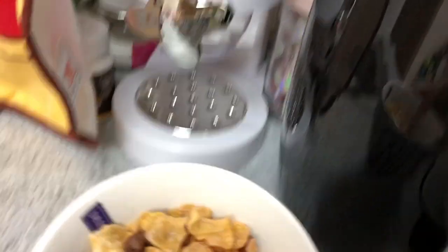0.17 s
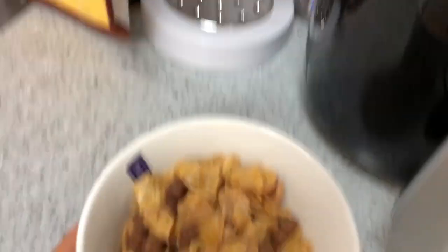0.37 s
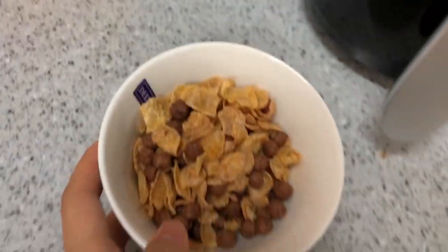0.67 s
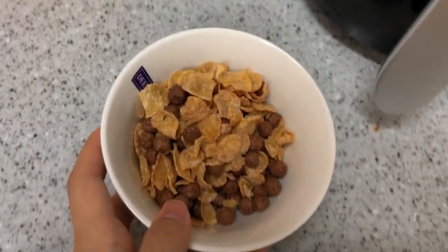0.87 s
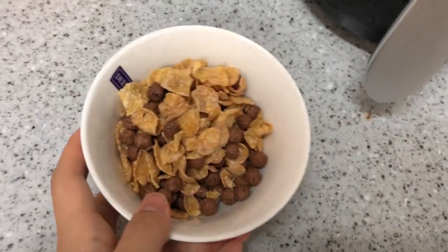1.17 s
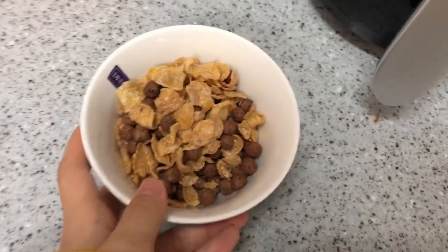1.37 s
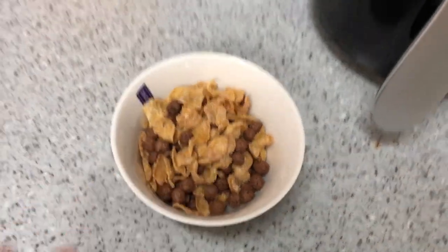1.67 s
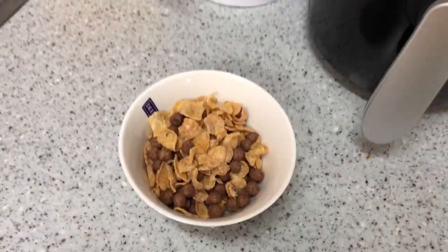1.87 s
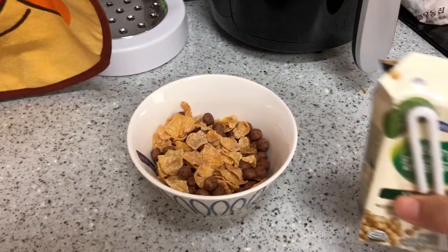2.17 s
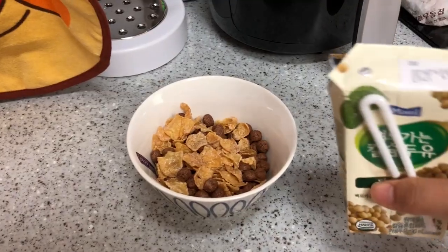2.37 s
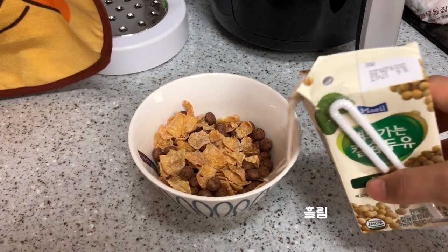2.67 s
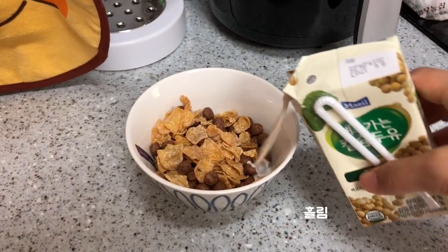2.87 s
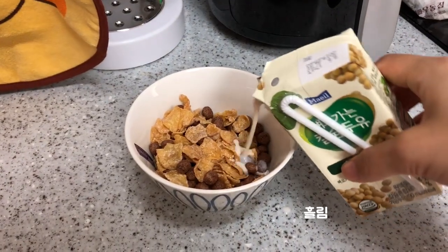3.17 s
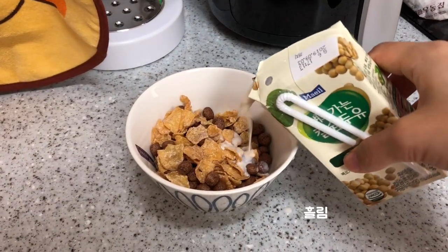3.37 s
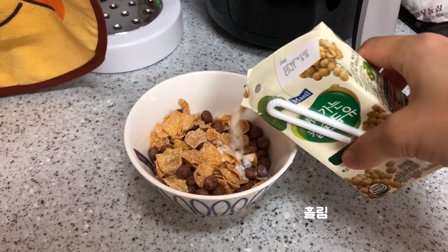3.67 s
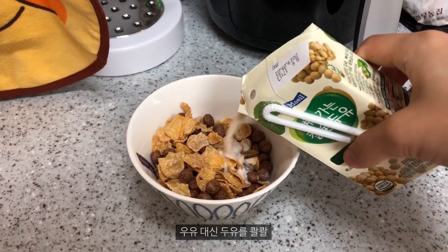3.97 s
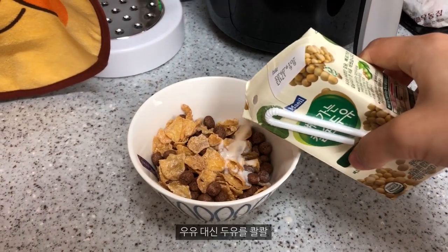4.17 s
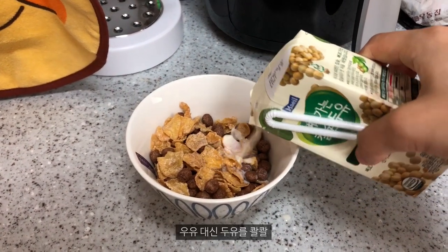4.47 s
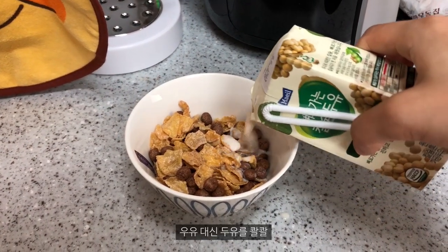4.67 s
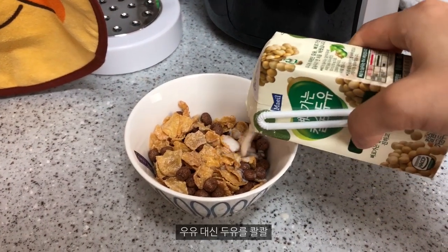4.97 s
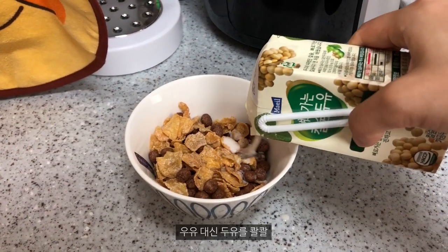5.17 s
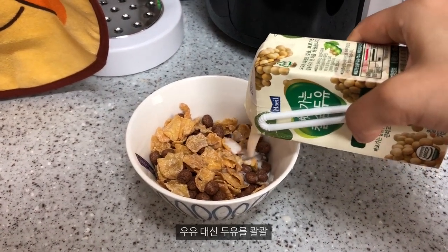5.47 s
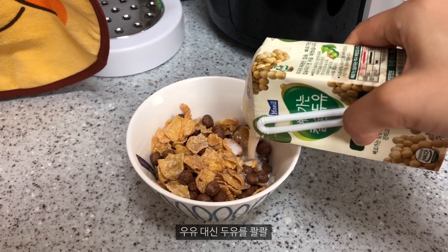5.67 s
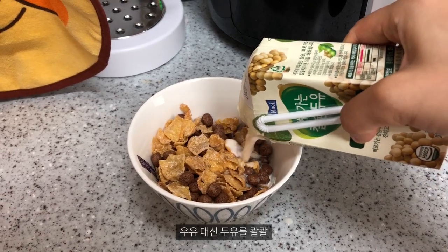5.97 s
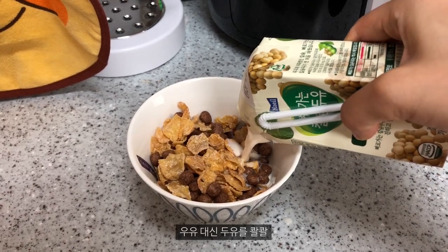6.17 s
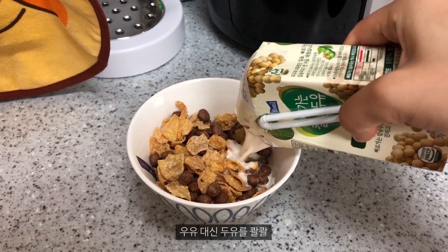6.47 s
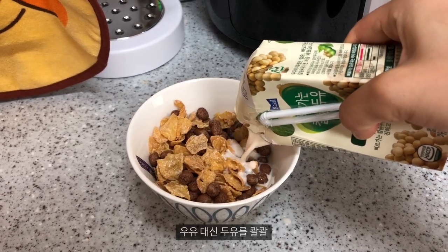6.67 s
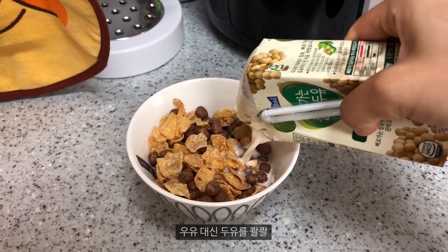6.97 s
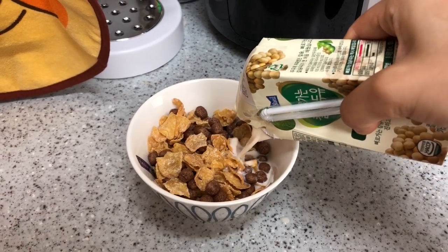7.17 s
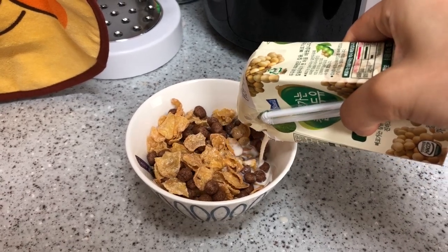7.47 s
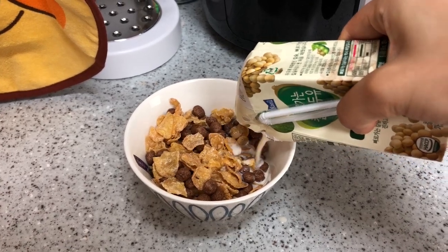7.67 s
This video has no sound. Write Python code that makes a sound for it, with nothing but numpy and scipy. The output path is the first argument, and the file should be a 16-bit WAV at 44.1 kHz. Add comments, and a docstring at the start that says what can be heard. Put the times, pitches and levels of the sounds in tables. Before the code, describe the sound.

Dry cereal flakes rustle briefly in a ceramic bowl, heard close up in a quiet kitchen. The bowl knocks onto a stone counter, scrapes a little and knocks again with a short ring. A carton crinkles, then milk trickles faintly into the cereal with a run of soft glugs. The flakes snap and crackle as it pours, most sharply near the end. A fridge hums far off.

```python
"""Cereal flakes rustle and snap in a ceramic bowl, heard from close by in a quiet kitchen.
The bowl is set on a stone counter, slid and set down again, which makes bowl and counter ring.
Then milk trickles in with tiny bubbles, the carton glugs as air enters it, and the flakes shift
and crack. A fridge hums far off."""
import sys
import numpy as np
from scipy import signal
from scipy.fft import rfft, irfft
from scipy.io import wavfile
from scipy.ndimage import uniform_filter1d

SR = 44100
rng = np.random.default_rng(int(sys.argv[2]) if len(sys.argv) > 2 else 0)


def wrap_up_sound(samples):
    """Save the sound to the file named by the first command line argument, as 16-bit audio."""
    columns = np.atleast_2d(samples).T
    # keep every value between -1 and 1, then stretch to whole-number steps
    tamed = np.clip(columns, -1, 1)
    steps = np.round(tamed * 32767).astype(np.int16)
    wavfile.write(sys.argv[1], SR, steps)


N = 345303

# The tone of the room's noise. Each row: frequency in Hz, relative level in dB.
ROOM_TONE = [(12, -56.5), (20, -28.5), (46, -8), (124, -5), (164, -13), (235, -7), (312, -10), (561, -16),
             (879, -21.5), (1160, -22.5), (1500, -25.5), (4460, -30.5), (4860, -31.5), (14500, -35.5),
             (16200, -42.5)]
# The heap is stirred and settles. Each row: time in seconds, level in dB, fading in dB per second.
STIRS = [(0.0, -50, 137), (0.2, -75.5, 20), (1.05, -78.5, 300), (1.46, -72, 24), (5.98, -74, 15),
         (6.78, -85, 30)]
# The tone of rustling flakes. Each row: frequency in Hz, relative level in dB.
RUSTLE_TONE = [(290, -55), (500, 1), (660, -9.5), (731, -0.5), (1200, 1.5), (2610, -2.5), (3930, 4),
               (14700, 1.5), (15800, -5), (16500, -24)]
# Short pings. Each row: start in seconds, level in dB, pitch in Hz, seconds to fade by 60 dB.
PINGS = [(0.004, -41, 10270, 0.062), (0.496, -63, 3770, .06), (0.518, -62.5, 3730, 0.078),
         (0.519, -64, 7200, .09), (4.072, -70, 4440, 0.04), (5.187, -47, 4380, 0.023)]
# Flakes snap. Each row: start in seconds, level in dB if all the energy came in 1 ms, pitch in Hz,
# rise up to that pitch in dB per octave, length in ms.
SNAPS = [(0.0098, -35, 10000, 10, 2.5), (0.021, -47, 15200, 8.5, 3.2), (0.049, -45, 8000, 11, 1.2),
         (0.0764, -34, 15200, 9, 0.7), (0.0944, -39, 11500, 5, 1.2), (0.1039, -36, 10700, 9, 4.1),
         (0.1098, -39.5, 12300, -4, 1.2), (0.1178, -35.5, 11500, 6.5, 1.2), (0.1278, -48, 8700, -2, 1.9),
         (0.145, -39.5, 11500, 15, 0.7), (0.1691, -48.5, 9300, 6, 1.2), (0.1842, -58, 12300, 4, 1.0),
         (0.1958, -56, 15200, -5, 0.91), (0.2245, -39, 12300, 3.5, 0.7), (0.2666, -51, 5400, 2.5, 0.89),
         (0.286, -50.5, 11500, 2, 0.73), (0.3132, -62, 15200, 1, 1.6), (0.4764, -62, 7600, 6, 1.2),
         (0.4959, -38.5, 15200, 6, 0.59), (0.5033, -49, 13200, 1, 1.1), (0.5108, -47, 15200, 0, 1.0),
         (0.5196, -41.5, 13200, 5, 0.81), (0.5772, -59.5, 15200, -2, 0.7), (0.9925, -59.5, 3500, -5, 3.7),
         (1.0833, -49.5, 15200, 7, 1.2), (1.4875, -41.5, 11900, 11, 0.79), (1.5122, -51.5, 12000, 4, 0.91),
         (1.5862, -57, 15200, -2, 1.2), (1.6663, -57.5, 7100, -5, 0.88), (1.7564, -56, 8200, 2.5, 0.78),
         (2.0636, -61.5, 13200, -1.5, 1.5), (2.499, -50.5, 7300, 11.5, 0.57), (3.1521, -50, 9300, 5, 0.65),
         (3.1778, -56.5, 7600, 12, 0.8), (3.2003, -59, 15200, 4, 1.1), (3.209, -60, 13200, -1.5, 1.3),
         (3.2289, -45, 10000, 5, 0.31), (3.3645, -60, 10000, 4, 1.6), (3.382, -52, 9300, 4, 1.0),
         (3.5269, -62, 10000, 2, 1.1), (3.7924, -55, 10700, 2, 1.4), (3.822, -63, 11500, 11, 1.6),
         (3.9037, -53, 8740, 5, 1.2), (4.0263, -63, 15200, 5, 1.0), (4.0766, -63.5, 4730, 10, 0.74),
         (4.376, -55, 15200, 6, 1), (4.5052, -56, 8700, 4, 0.95), (4.5128, -57, 4400, 4, 1.2),
         (4.5228, -51.5, 15200, 7, 1.2), (4.5701, -59, 5700, 7, 1.1), (4.5888, -53, 4150, 12, 0.84),
         (4.7605, -56.5, 12300, 1, 0.8), (4.8073, -49.5, 10000, 18, 1.2), (4.862, -41.5, 7740, 6, 1.4),
         (4.8999, -53, 15200, 4, 0.98), (5.0242, -43, 10700, 7, 0.9), (5.0382, -43.5, 7200, 15, 1.0),
         (5.0439, -56, 8700, -2, 2.5), (5.0754, -61, 6200, 4, 1.1), (5.228, -43.5, 15200, 0, 2),
         (5.3321, -62, 11500, 5, 0.8), (5.4839, -58.5, 13200, 8, 1.0), (5.5356, -62, 10700, 5, 0.9),
         (5.6706, -58, 7600, 6, 1.6), (5.6863, -52, 13200, 6.5, 1.2), (5.7472, -49.5, 13100, 0, 1.0),
         (5.824, -56.5, 5700, 12, 0.92), (5.8302, -58.5, 8700, -3, 0.91), (5.8811, -36.5, 14100, 7, 1.0),
         (5.9414, -48, 3620, 29, 0.86), (5.9511, -51, 15200, -1, 0.8), (5.9728, -36.5, 6740, 13, 1.6),
         (6.0023, -68, 7600, 4, 1.0), (6.0107, -19, 12600, 8, 1.1), (6.0275, -47, 12300, 4, 0.7),
         (6.1108, -64, 7100, 2, 1.8), (6.1172, -47, 15200, 18, 0.8), (6.1336, -25, 15200, 7.5, 1.1),
         (6.1421, -40.5, 10700, 2.5, 1.4), (6.1614, -42.5, 9350, 6.5, 0.74),
         (6.1879, -37.5, 15200, -1, 1.1), (6.2391, -61, 15200, -3, 1.4), (6.282, -51, 15200, 14, 0.98),
         (6.3113, -62, 6600, 1, 1.4), (6.3698, -33.5, 12300, 9.5, 0.55), (6.3906, -36, 11500, 21, 0.59),
         (6.4346, -47.5, 10700, 6.5, 0.8), (6.4554, -34, 15100, 4, 1.1), (6.5086, -55, 9300, 15, 0.9),
         (6.5306, -42, 15200, 0.5, 0.99), (6.5428, -50.5, 8100, -1, 0.97), (6.5487, -37.5, 10700, 11, 0.41),
         (6.5886, -44.5, 13200, 6, 0.73), (6.6515, -61, 10000, 6, 1.1), (6.7041, -55, 15200, 8, 0.7),
         (6.7116, -44.5, 8800, 2, 2.3), (6.7832, -25.5, 9750, 11.5, 1.2), (6.811, -64, 5000, 8, 2.1),
         (6.8162, -43.5, 11500, -1, 0.78), (6.8252, -44, 15200, 3.5, 1.0), (6.8368, -34, 13100, 5.5, 0.7),
         (6.91, -57, 13200, 16, 0.7), (7.0422, -47.5, 13200, 11.5, 0.7), (7.0883, -60, 13500, 1, 0.8),
         (7.2053, -47.5, 15200, 6, 1.7), (7.2348, -56, 15200, 2, 0.88), (7.2794, -43, 11500, 14, 1.5),
         (7.45, -51.5, 5080, 12.5, 0.76)]
# Longer, gritty crinkles of the carton and of wet flakes. Rows read as in SNAPS.
CRINKLES = [(2.211, -50.5, 12000, 10, 17), (2.232, -38, 13500, 5.2, 17), (2.26, -59.5, 2800, 16, 17),
            (2.284, -56.5, 15000, 8, 16), (2.87, -64, 3500, 2, 42), (3.35, -56, 12000, 2, 57),
            (4.756, -56.5, 3960, 1, 56), (5.026, -46, 15000, 3.3, 8.8), (5.55, -63, 2800, 1.9, 49),
            (6.79, -49.5, 8000, 1.5, 45)]
# The air in the bowl rings. Each row: pitch in Hz, gain in dB, seconds to fade by 60 dB.
HOLLOW_NOTES = [(3190, -42.5, 0.016), (1490, -34.5, 0.012), (7420, -44, 0.0087)]
# Soft bumps of a hand. Each row: start in seconds, level in dB, pitch in Hz.
HAND_BUMPS = [(0.123, -53.5, 275), (2.438, -53.5, 194)]
# The bowl's foot meets the counter, and its weight follows more softly.
# Each row: start in seconds, push in dB, contact time in ms.
BLOWS = [(1.049, -16.5, 0.19), (1.0544, -9, 1.1), (1.066, -23.5, 3.6), (1.402, -28, 2.3), (1.463, -22, 1.2),
         (1.472, -13, 0.15), (1.479, -28.5, .6), (1.486, -7.5, 1.11), (1.495, -4, 4)]
# Counter and bowl ring together. Each row: pitch in Hz, gain in dB, seconds to fade by 60 dB.
COUNTER_NOTES = [(74, -21.5, 0.302), (109.8, -18.5, 0.35), (124.6, -11.5, 0.25), (231, -6.5, 0.17),
                 (279, -16.5, 0.26), (292.3, -23, 0.33), (358, -51, 0.13), (403, -23, 0.42),
                 (478, 3, 0.044), (485, -25.5, 0.51), (536, -9, 0.0794), (583, -26, 0.067),
                 (622, -19, 0.57), (673, -7, 0.063), (738, -27, 0.19), (817, -13, 0.23), (910, -21.5, 0.2),
                 (940, -13, 0.16), (954, 0.5, 0.027), (1033, -27.5, 0.25), (1360, -31, 0.16),
                 (1355, -16, 0.26), (1615, -16, 0.22), (1716, -11, 0.21), (2030, -13.5, 0.089),
                 (2610, -20, 0.156), (3110, -20.5, 0.11)]
# The tone of the bowl's thud. Each row: frequency in Hz, relative level in dB.
THUD_TONE = [(60, -80), (150, 0.5), (300, -6.5), (520, 7), (1000, 2), (2000, -4.5), (4000, -21),
             (8000, -20), (14000, -11.5)]
# The foot scrapes over the stone in two pushes, then grazes it before landing.
# One list for the scrape, one for the graze. Each row: time in seconds, level in dB.
SLIDE_LEVELS = [
    [(1.12, -70), (1.155, -58), (1.23, -62), (1.28, -54.5), (1.35, -55), (1.41, -73)],
    [(1.44, -80.5), (1.46, -56), (1.475, -76)],
]
# The tone of that scraping. Each row: frequency in Hz, relative level in dB.
SCRAPE_TONE = [(88, -41.5), (150, -28), (167, -17), (277, 2), (361, -10), (551, 3), (591, -17.5),
               (656, 4.5), (1050, -11.5), (1760, -9.5), (2290, -20), (2870, -13), (10000, -39.5),
               (13000, -41), (22000, -120)]
# Milk runs through the flakes in one stretch. Each row: time in seconds, level in dB.
TRICKLE_LEVELS = [
    [(2.75, -95), (3.0, -88), (3.7, -99), (4.3, -88.5), (5.1, -78), (5.4, -97), (6.1, -77), (7.0, -82),
     (7.6, -91)],
]
# Air bubbles enter the carton. Each row: start in seconds, level in dB, pitch in Hz, overtone in dB.
GLUGS = [(3.828, -57.5, 327, -28), (3.91, -65, 448, -22), (4.44, -57.5, 347, -7.5),
         (4.569, -59.5, 447, -13), (4.697, -60.5, 480, -8), (4.832, -58, 468, -3.5),
         (4.972, -56.5, 463, -10.5), (5.124, -57, 443, -10)]


def undb(db):
    return 10 ** (np.asarray(db) / 20)


def unit(x):
    return x / np.sqrt(np.mean(x ** 2))


def fade(t, t60):
    """Dies away by 60 dB in t60 seconds."""
    return np.exp(-np.log(1000) * t / t60)


def colour(x, tone):
    """Gives a sound the tone in rows of Hz and dB; white noise keeps its power."""
    hz, db = np.transpose(tone)
    log_hz = np.log(np.fft.rfftfreq(4096, 1 / SR) + 1)
    cepstrum = irfft(np.interp(log_hz, np.log(hz), db) * np.log(10) / 20)
    cepstrum[1:2048] *= 2  # folded, so nothing rings before the sound starts
    cepstrum[2049:] = 0
    kernel = irfft(np.exp(rfft(cepstrum)))
    return signal.fftconvolve(x, kernel / np.sqrt(np.sum(kernel ** 2)))[:len(x)]


def band(x, lo_hz, hi_hz):
    return signal.sosfilt(signal.butter(2, [lo_hz, min(hi_hz, .45 * SR)], "band", fs=SR, output="sos"), x)


def curve(stretches):
    """Loudness that follows rows of seconds and dB, silent outside each stretch."""
    t = np.arange(N) / SR
    return sum(undb(np.interp(t, *np.transpose(rows), left=-200, right=-200)) for rows in stretches)


def wander(per_s):
    """A smooth random drift, with per_s new values a second."""
    hold = int(SR / per_s)
    steps = np.repeat(rng.standard_normal(N // hold + 1), hold)
    return 0.55 * uniform_filter1d(uniform_filter1d(steps, hold), hold)[:N]


def add(track, start_s, sound):
    i = int(start_s * SR)
    track[i:i + len(sound)] += sound[:N - i]


def tail(x, db, t60, lo_hz, hi_hz):
    """Many echoes blur into fading noise."""
    t = np.arange(int(.5 * SR)) / SR
    echo = band(rng.standard_normal(len(t)), lo_hz, hi_hz) * fade(t, t60)
    return undb(db) * signal.fftconvolve(x, echo / np.sqrt(np.sum(echo ** 2)))[:N]


def room_noise(level_db=-70.5):
    """A soft hush whose bass wavers."""
    air = unit(colour(rng.standard_normal(N), ROOM_TONE))
    swell = undb(0.41 * wander(0.81) + 3.6 * wander(14))
    deep, bass = band(air, 16, 100), band(air, 140, 540)
    return undb(level_db) * (air - deep + (swell - 1) * bass)


def fridge(hz=138.5, width_hz=13, level_db=-75):
    """A far fridge: a narrow band of noise makes its wavering hum."""
    return undb(level_db) * unit(band(rng.standard_normal(N), hz - width_hz / 2, hz + width_hz / 2))


def rumble(level_db=-79, swing_db=4.5):
    """A deep rumble comes and goes."""
    return undb(level_db + swing_db * wander(1.3)) * unit(band(rng.standard_normal(N), 51, 75.3))


def rustle(clicks_per_s=2500, spread_db=0.5, rise_db_per_s=311, hold_s=0.068):
    """Stirred flakes make tiny uneven clicks; each stir rises fast, holds and dies away."""
    t = np.arange(N) / SR
    stirred = sum(undb(db - rise_db_per_s * np.maximum(s - t, 0) - fall * np.maximum(t - s - hold_s, 0))
                  for s, db, fall in STIRS)
    hits = rng.random(N) < clicks_per_s / SR
    sizes = undb(spread_db * np.clip(rng.standard_normal(N), -3, 2))
    clicks = unit(hits * sizes * rng.choice([-1, 1], N))
    return stirred * unit(colour(clicks + 0.73 * rng.standard_normal(N), RUSTLE_TONE))


def pings():
    """Each ping is four close notes that beat roughly as they die."""
    out, t = np.zeros(N), np.arange(4096) / SR
    for (s, db, hz, t60), offsets in zip(PINGS, rng.standard_normal((len(PINGS), 3))):
        neighbours = sum(np.sin(2 * np.pi * near_hz * t) for near_hz in hz + 11 / t60 * offsets)
        notes = np.sin(2 * np.pi * hz * t) + .5 * neighbours
        attack = 1 - np.exp(-t / 0.00015)
        add(out, s, undb(db) * notes * attack * fade(t, t60))
    return out


def cracks(events, crumble=0.046, low_hz=1600, fall_db_per_octave=15, uneven_db=2.5):
    """Bursts of cracks, duller or brighter with the piece's size; crumble adds a brief after-crackle."""
    out, t = np.zeros(N), np.arange(3072) / SR
    resonance_hz = np.geomspace(low_hz, .4 * SR, num=16)
    noises = rng.standard_normal((len(events), 2, len(t)))
    for (s, db, hz, rise_db, ms), (noise, grit) in zip(events, noises):
        snap = (t * 1000 / ms) ** 0.11 * np.exp(-t * 2700 / np.clip(ms, .2, 60))
        shape = snap + crumble * np.exp(-t / .005)
        burst = noise * shape * undb(5.1 * uniform_filter1d(grit, size=24))
        low_db = -rise_db * np.log2(hz / low_hz)
        tone = [(low_hz / 2, low_db - 20), (low_hz, low_db), (hz, 0), (8 * hz, -3 * fall_db_per_octave)]
        resonances = np.c_[resonance_hz, uneven_db * noise[-16:]]  # every piece has its own
        piece = colour(colour(burst, tone), resonances)
        add(out, s, undb(db) * piece / np.sqrt(np.sum(piece ** 2) * 1000 / SR))
    return out


def hollow(x):
    """The air in the bowl rings along with whatever cracks inside it."""
    t = np.arange(4096) / SR
    notes = sum(undb(db) * np.sin(2 * np.pi * hz * t) * fade(t, t60) for hz, db, t60 in HOLLOW_NOTES)
    return x + signal.fftconvolve(x, notes)[:N]


def hand_bumps():
    """A hand makes a dull knock, only a few vibrations long."""
    out, t = np.zeros(N), np.arange(4096) / SR
    swell = t / 0.0085 * np.exp(1 - t / 0.0048)
    for s, db, hz in HAND_BUMPS:
        add(out, s, undb(db) * swell * np.sin(2 * np.pi * hz * t))
    return out


def ring(force):
    """Counter and bowl ring when pushed; neighbouring notes start opposed, so close pairs swell late."""
    t = np.arange(int(.7 * SR)) / SR
    notes = sum((-1) ** k * undb(db) * np.sin(2 * np.pi * hz * t) * fade(t, t60)
                for k, (hz, db, t60) in enumerate(COUNTER_NOTES))
    return band(signal.fftconvolve(force, notes)[:N], 82, 15000)


def bowl_knocks():
    """Each blow is a short push that rings clear notes and a blur of closer ones."""
    force = np.zeros(N)
    for s, db, ms in BLOWS:
        push = np.hanning(int(np.clip(ms, .1, 8) * SR / 1000) + 3)
        add(force, s, undb(db) * push / push.sum())
    blur = colour(tail(force, -0.5, 0.25, 200, 4030) + tail(force, 4.6, 0.092, 600, 9650), THUD_TONE)
    clack = tail(force, -4.5, 0.092, 1500, 3920)  # the hard rim of the foot
    return undb(-19.5) * ring(force) + blur + clack


def bowl_slide():
    """The foot grinds over the stone and rings bowl and counter."""
    grit = rng.standard_normal(N) * undb(2.7 * wander(120))
    ringing = unit(ring(np.diff(grit, prepend=0)))  # grit favours the high notes
    return curve(SLIDE_LEVELS) * (unit(colour(grit, SCRAPE_TONE)) + undb(-7.5) * ringing)


def milk_trickle(count=6000, lowest_hz=850, octaves=1.79, spread_db=11):
    """Small bubbles of random size ring for a moment, gliding up in pitch."""
    out, t = np.zeros(N), np.arange(512) / SR
    for when, height, loud in rng.random((count, 3)):
        hz = lowest_hz * 2 ** (octaves * height)
        bubble = np.sin(2 * np.pi * hz * t * (1 + 12 * t)) * np.exp(-hz * t / 2.0)
        add(out, when * (N - 1) / SR, undb(spread_db * loud) * bubble)
    return curve(TRICKLE_LEVELS) * unit(out)


def faint_snaps(count=150, pour_s=(2.8, 7.4), lo_hz=2200, hi_hz=11000, quietest_db=-74.5, spread_db=2):
    """Small flakes give way at random while the milk runs, each with its own pitch."""
    when, height, loud = rng.random((count, 3)).T
    starts = np.interp(when, (0, 1), pour_s)
    levels = quietest_db - spread_db * np.log(1 - loud)
    pitches = lo_hz * (hi_hz / lo_hz) ** height
    return cracks([(s, db, hz, 2, 1) for s, db, hz in zip(starts, levels, pitches)])  # rows as in SNAPS


def carton_glugs():
    """An air bubble rings briefly and rises a little, with a smaller one just over an octave up."""
    out, t = np.zeros(N), np.arange(2048) / SR
    swell = t / 0.002 * np.exp(1 - t / 0.0023)
    for s, db, hz, overtone_db in GLUGS:
        phase = 2 * np.pi * hz * t * (1 + 1.5 * t)
        add(out, s, undb(db) * swell * (np.sin(phase) + undb(overtone_db) * np.sin(2.2 * phase)))
    return out


def scene():
    """Flakes with their faint echo off the walls, plus bowl, milk, hand and kitchen, in one channel."""
    flakes = hollow(cracks(SNAPS) + faint_snaps() + cracks(CRINKLES, crumble=0)) + rustle() + pings()
    walls = tail(flakes, -14.0, 0.098, 1200, 15000) + tail(flakes, -15, 0.078, 2430, 8000)
    bowl = bowl_knocks() + bowl_slide()
    milk = milk_trickle() + carton_glugs()
    kitchen = room_noise() + fridge() + rumble()
    return (flakes + walls + bowl + milk + hand_bumps() + kitchen)[None]


def record(dry):
    """The small microphone lifts a narrow band of high treble, then the very top is cut."""
    peak_hz, width_hz, peak_db, top_hz = 15140, 1000, 6.5, 16500
    lift = band(dry, peak_hz - width_hz / 2, peak_hz + width_hz / 2) * (undb(peak_db) - 1)
    return signal.sosfilt(signal.ellip(8, .2, 70, top_hz, fs=SR, output="sos"), dry + lift)


dry = scene()
out = record(dry)
wrap_up_sound(out)
```